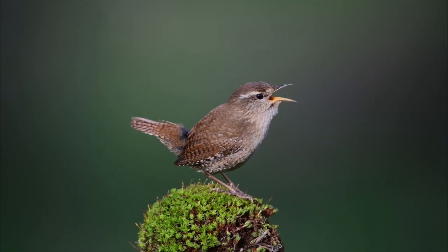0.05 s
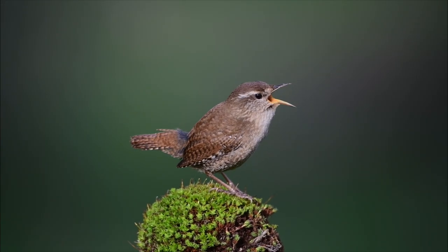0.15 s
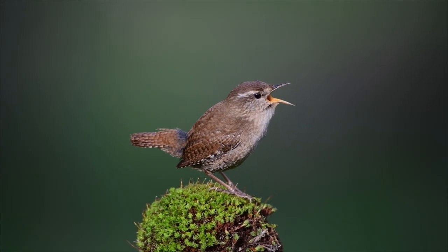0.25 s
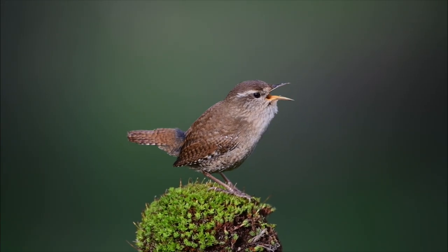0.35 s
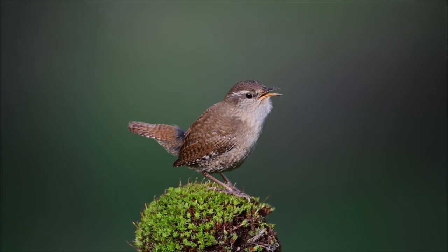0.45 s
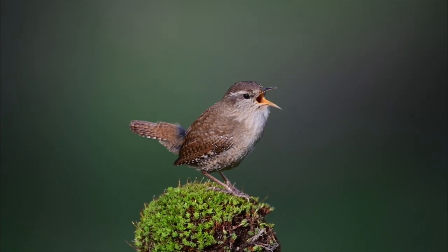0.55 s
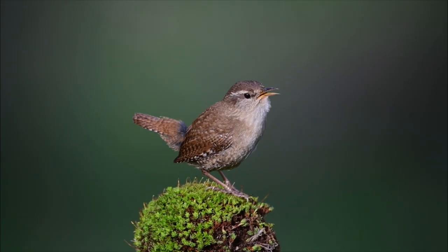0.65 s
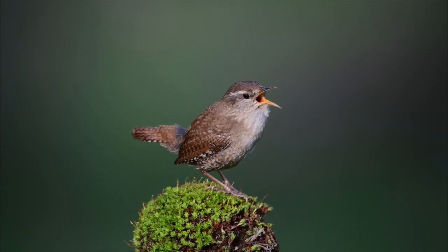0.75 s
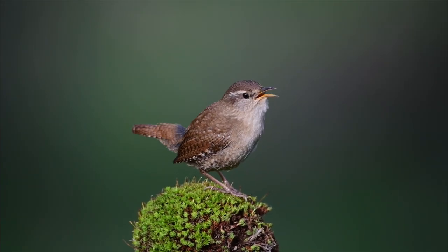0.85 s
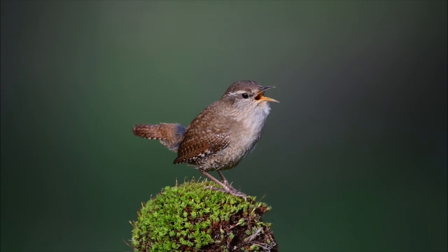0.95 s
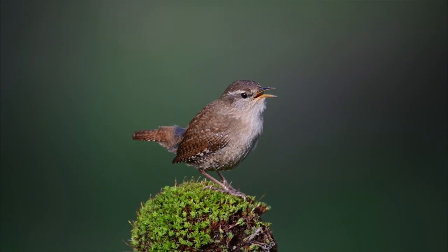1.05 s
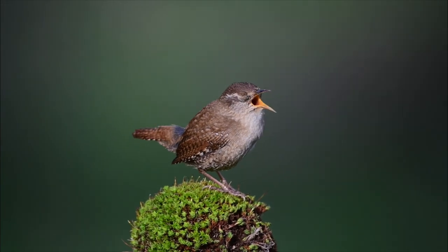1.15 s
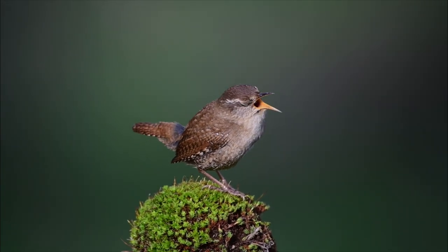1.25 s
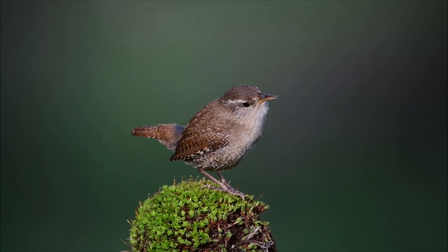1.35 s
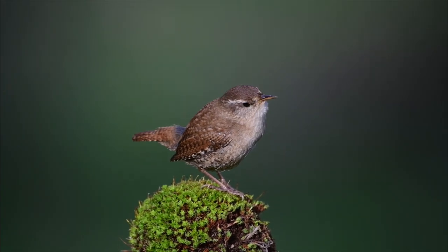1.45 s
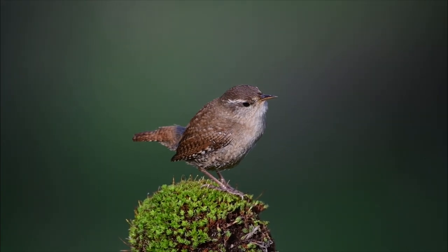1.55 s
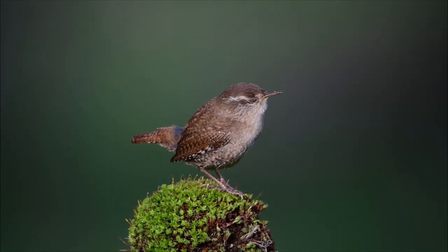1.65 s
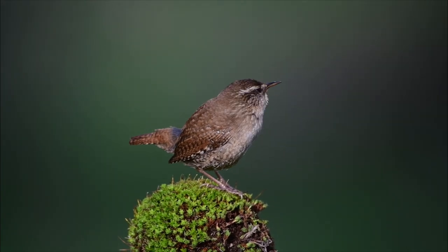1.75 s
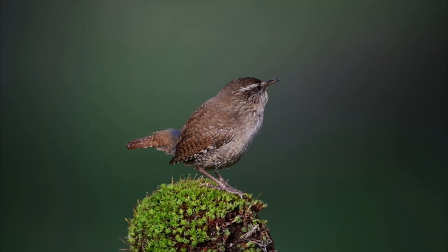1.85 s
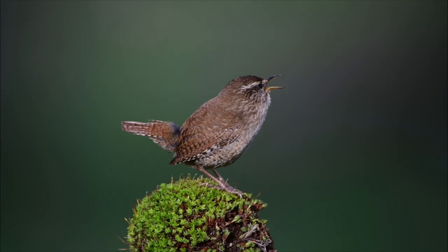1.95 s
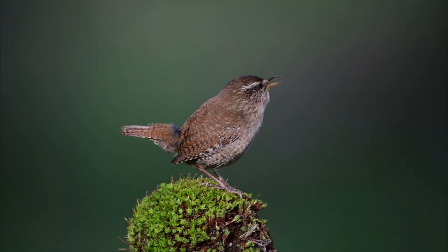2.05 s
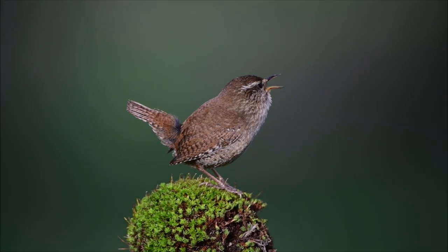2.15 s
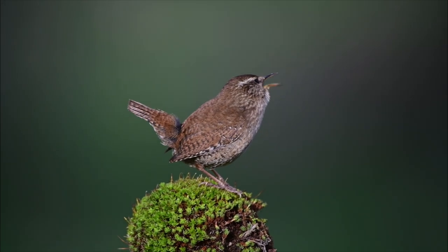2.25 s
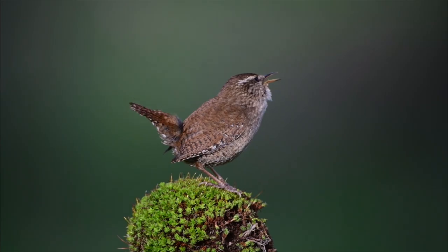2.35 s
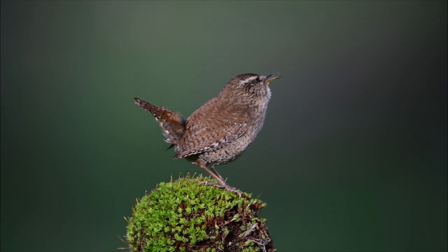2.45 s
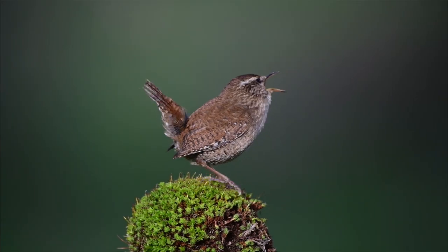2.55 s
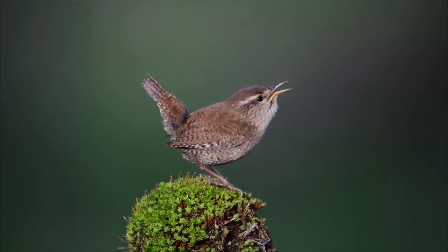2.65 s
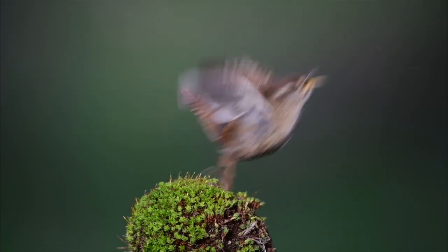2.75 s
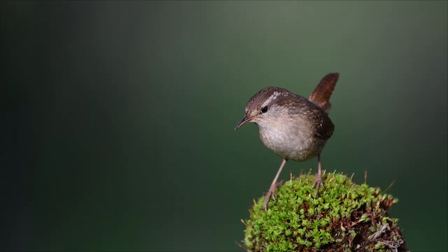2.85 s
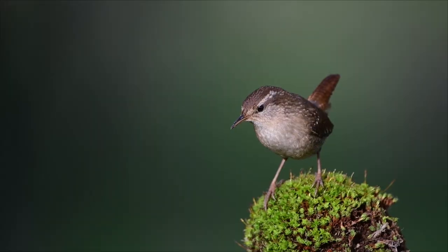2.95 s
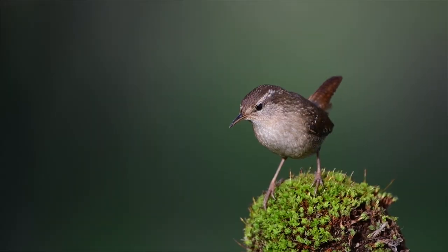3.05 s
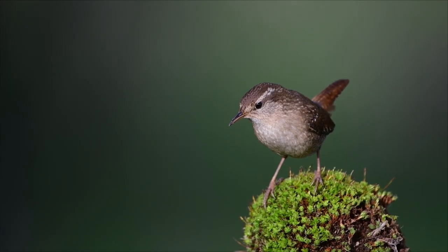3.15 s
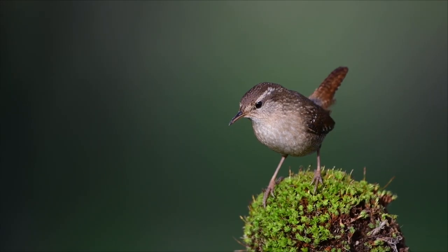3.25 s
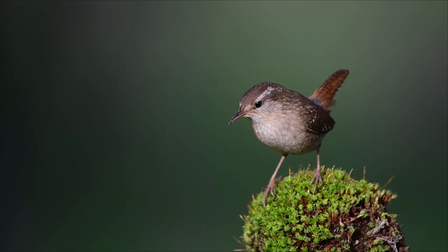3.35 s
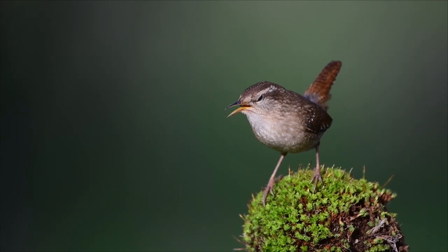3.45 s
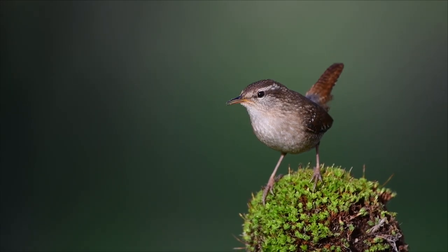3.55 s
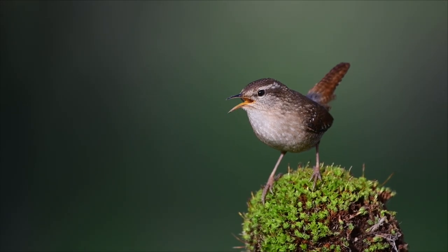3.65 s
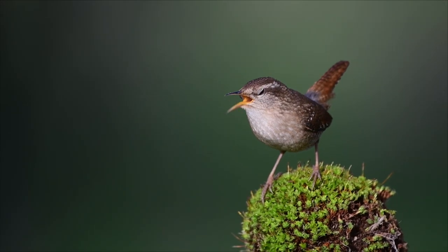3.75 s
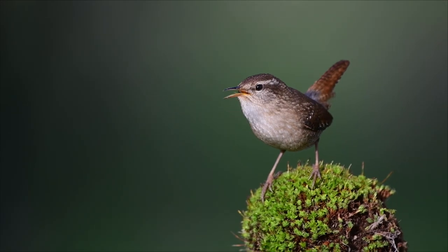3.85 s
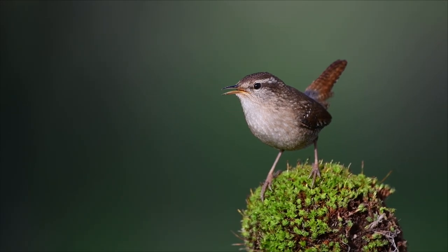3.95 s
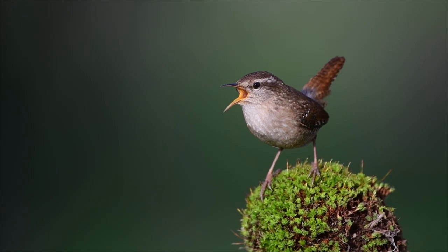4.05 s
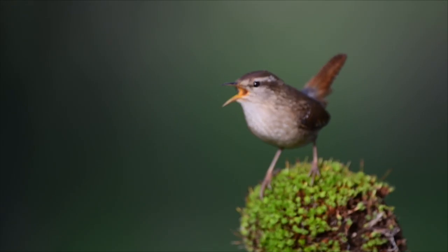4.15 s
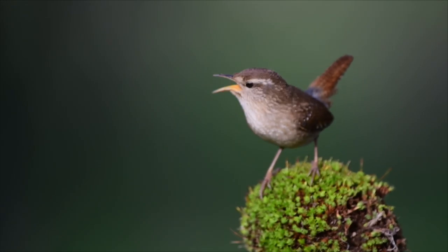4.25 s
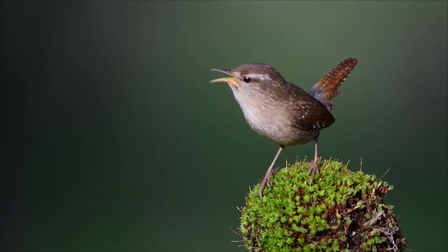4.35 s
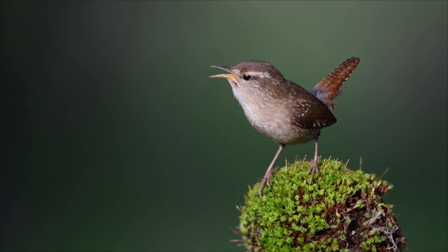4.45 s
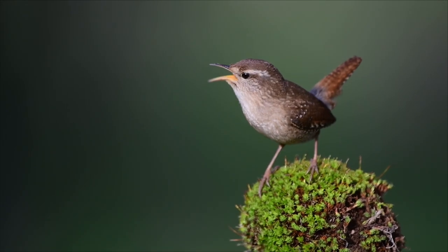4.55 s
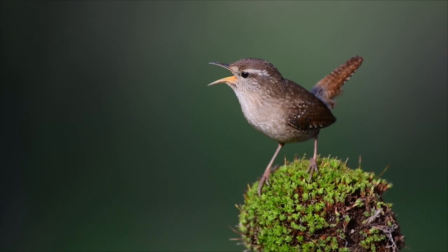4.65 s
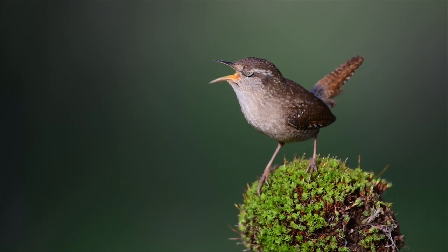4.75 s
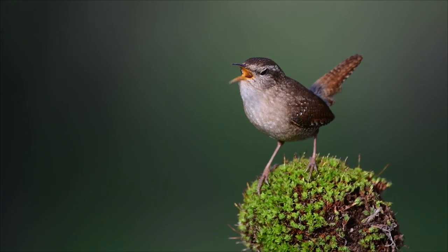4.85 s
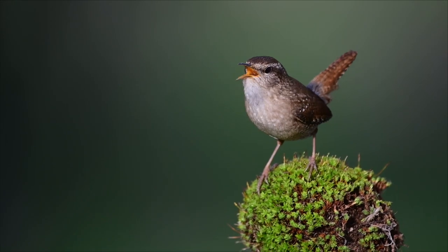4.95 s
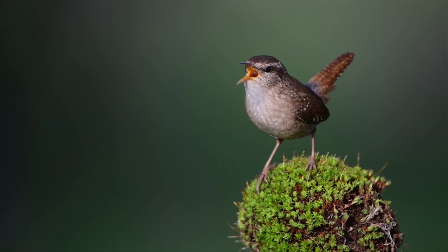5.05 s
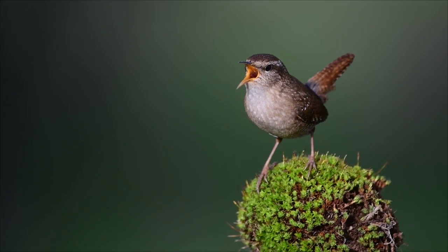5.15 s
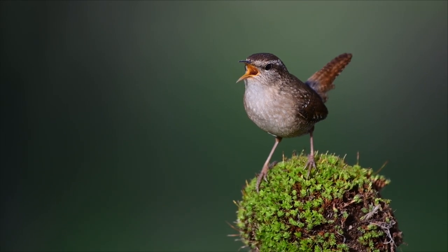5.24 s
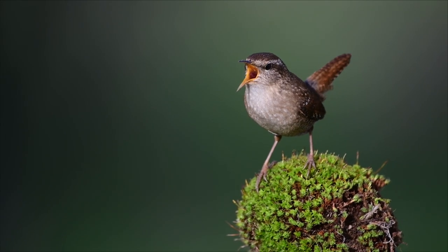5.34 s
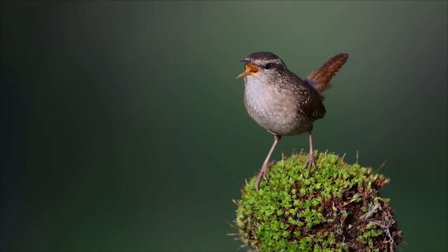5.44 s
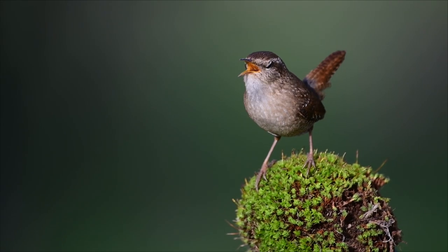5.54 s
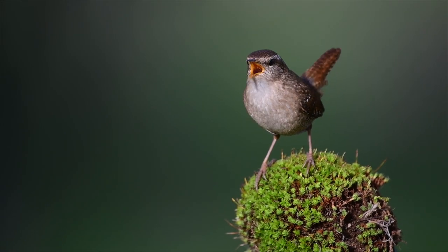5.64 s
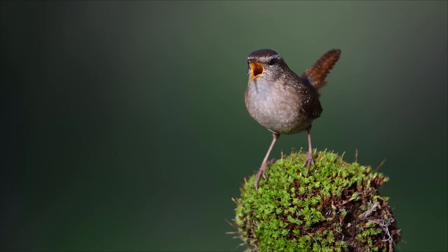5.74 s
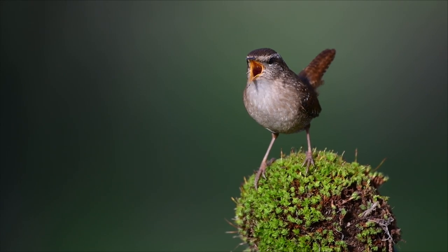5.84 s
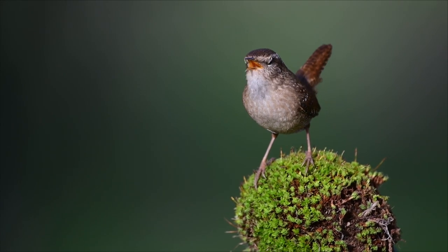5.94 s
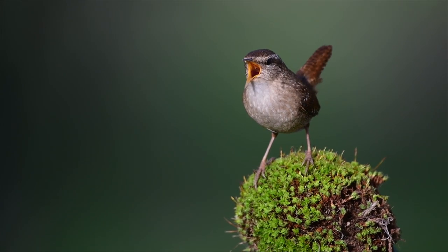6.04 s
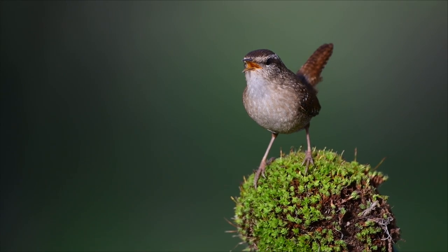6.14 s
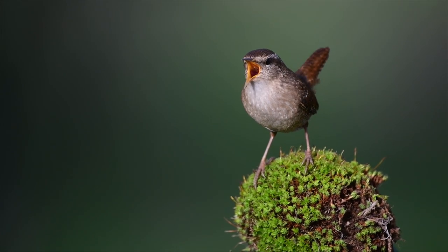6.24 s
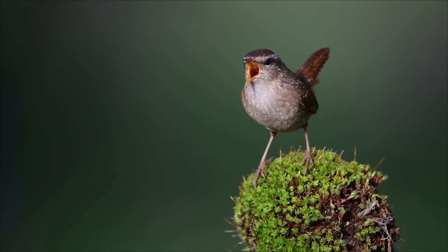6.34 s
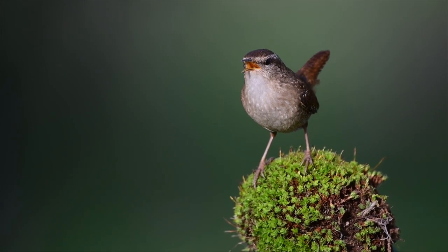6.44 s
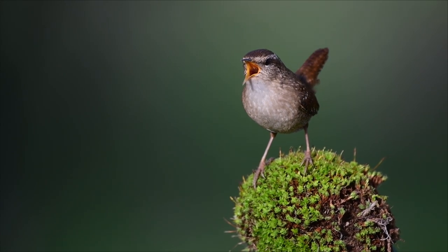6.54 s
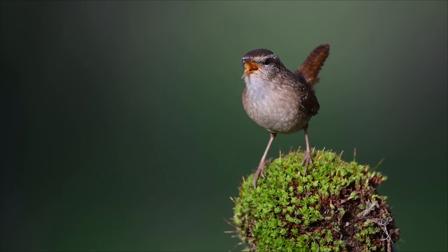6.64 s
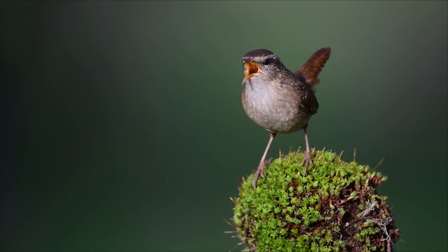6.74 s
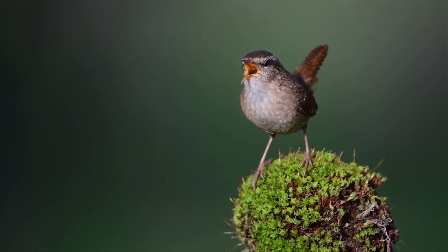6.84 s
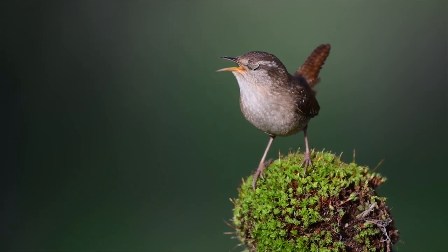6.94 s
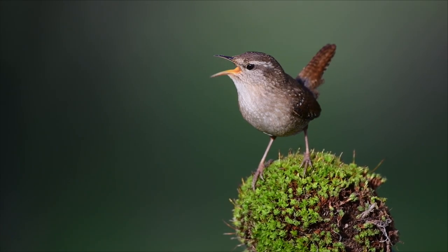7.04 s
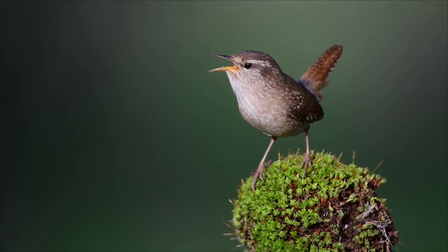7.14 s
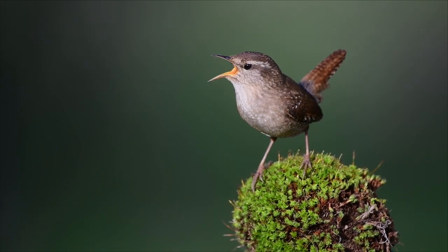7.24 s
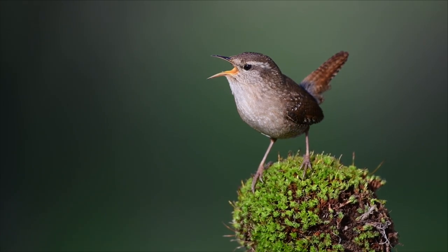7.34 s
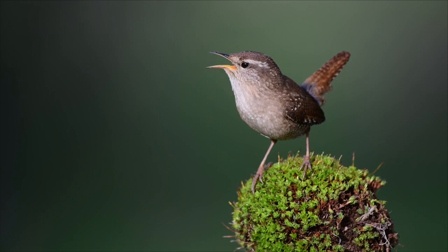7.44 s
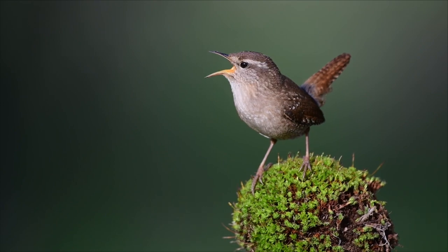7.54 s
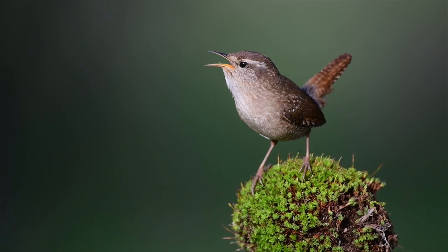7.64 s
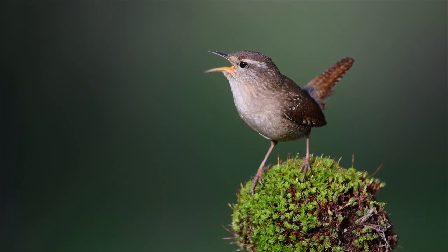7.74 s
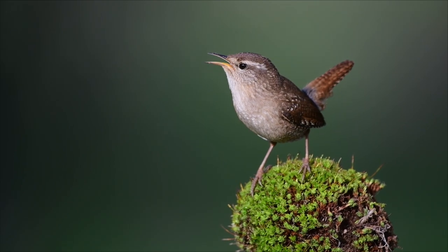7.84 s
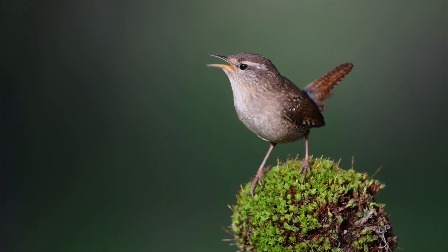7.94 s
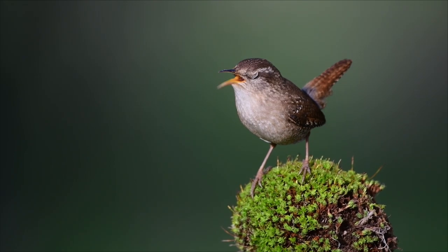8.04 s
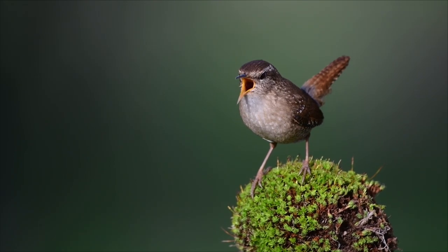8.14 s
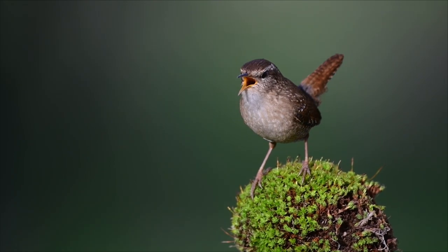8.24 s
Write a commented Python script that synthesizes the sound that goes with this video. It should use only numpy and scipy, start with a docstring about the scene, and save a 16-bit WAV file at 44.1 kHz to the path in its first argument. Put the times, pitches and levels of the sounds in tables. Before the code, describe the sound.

Close outdoor pickup of a wren, very high and clear, with short diffuse echoes from trees. At 0 s three quick upward trill notes finish, then a thin falling whistle and, from 0.4 to 1.1 s, strong downward slides. A long, flat, high tone follows at 1.2 s. From 2 to 2.75 s come softer dips, chirps and held notes, then a trill begins, cut by a tiny dip at 2.9 s. Only faint air, distant traffic and a low engine hum remain until 3.55 s, when the soft phrase returns. From 4.25 to 5.4 s a fast, rattling trill grows louder and slows slightly, with low wind bumps and small dull ticks nearby. Falling whistles ring out until 6.3 s, then a high held note and a wavering turn. From 6.8 s sharp zigzags alternate up and down, ending in quick plunges near 8.2 s.

```python
"""First come three quick notes of a wren's trill, then whistled slides, longer trills and zigzags.
Each note is a gliding sine; trees answer with random echoes that die away.
Underneath are a noise bed of air and traffic, a far engine built from sines, and two faint glides.
Low noise makes wind bumps on the microphone; short noise bursts tick close by.
Just before 2.9 s the level dips briefly and the echoes are cut."""
import sys
import numpy as np
from scipy import signal
from scipy.io import wavfile
from scipy.ndimage import uniform_filter1d

SR = 44100
rng = np.random.default_rng(int(sys.argv[2]) if len(sys.argv) > 2 else 0)


def generate_wav(sig):
    """Save sig (samples, or channels by samples) to the path in sys.argv[1] as 16-bit PCM at SR."""
    pcm = np.round(np.clip(np.atleast_2d(sig).T, -1, 1) * 32767).astype(np.int16)
    wavfile.write(sys.argv[1], SR, pcm)


N = 365588  # length in samples


def gain_of(db):
    """Turns decibels into a factor for the waveform."""
    return 10 ** (np.asarray(db) / 20)


def evened(x):
    """Scales a signal to an average (rms) strength of one."""
    return x / np.sqrt(np.mean(x ** 2) + 1e-20)


def read(points, hz):
    """Reads a table between its points, along a logarithmic frequency axis."""
    f, value = np.transpose(points)
    return np.interp(np.log(hz + 1), np.log(f + 1), value)


def add(mix, s, sound):
    """Mixes a sound in from time s, cutting off what runs past the end."""
    part = mix[round(s * SR):][:len(sound)]
    part += sound[:len(part)]


def curves(rows):
    """Draws each table column as a curve, sample by sample from the first to the last time."""
    s, *columns = np.transpose(rows)
    t = np.arange(s[0], s[-1], 1 / SR)
    return [np.interp(t, s, column) for column in columns]


def wander(n, span):
    """Makes a slow random curve of rms one by smoothing noise twice over span seconds."""
    width = max(round(span * SR), 2)
    smooth = uniform_filter1d(rng.standard_normal(n), width)
    return evened(uniform_filter1d(smooth, width))


# tone colour of the outdoor noise, only its shape counts: (f/Hz, relative level/dB per Hz)
AIR_COLOUR = [(25, -27.5), (140, -7), (300, -11.5), (700, -15), (1200, -21), (2500, -26), (8300, -34),
              (12700, -40.5), (13100, -42), (15500, -53.5)]
# how alike the noise is in the two ears: (f/Hz, likeness, 1 = the same)
EAR_LIKENESS = [(60, 1), (310, 0.94), (1550, 0.55), (7900, 0.056)]
# how the traffic swells and sinks: (t/s, relative level/dB)
TRAFFIC_LEVEL = [(0, -59), (2.88, -59), (2.92, -55.5), (4.64, -55), (5.601, -56.5), (8.29, -58)]


def background():
    """Air and traffic: random short-time spectra, in which passing traffic lifts the low end most."""
    frames, hz = N // 256 + 5, np.fft.rfftfreq(1024, 1 / SR)
    a, b, c, d, patches = rng.standard_normal((frames, 513, 5)).T
    # smooth over neighbouring frequencies, then over time
    patches = uniform_filter1d(uniform_filter1d(patches, 10, 0), 12, 1)
    patches_db = 0.75 * evened(patches)

    likeness = np.clip(read(EAR_LIKENESS, hz), -1, 1)[:, None]
    left = a + 1j * b
    right = likeness * left + np.sqrt(1 - likeness ** 2) * (c + 1j * d)

    s, db = np.transpose(TRAFFIC_LEVEL)
    quiet_db = db.min()
    lift_db = np.interp(np.arange(frames) * 256 / SR, s, db - quiet_db)
    lift_share = 1 / (1 + (hz[:, None] / 3000) ** 2)  # less lift towards the treble

    colour = gain_of(read(AIR_COLOUR, hz))
    middle = (hz > 300) & (hz < 1500)
    colour /= np.sqrt(np.sum(colour[middle] ** 2))
    level = colour[:, None] * gain_of(quiet_db + lift_share * lift_db + patches_db)
    spectra = np.array([left, right]) * level
    return 0.85 * signal.istft(spectra, nperseg=1024, noverlap=768)[1][:, :N]


# far engine: (t/s, shaft f/Hz before wavering, second-order level/dB, fourth-order level/dB)
ENGINE_RUN = [(0, 66.8, -64.5, -61.5), (.5, 67.65, -63, -68.5), (1.1, 69.14, -66, -68.5),
              (1.45, 72.1, -61.5, -76.5), (2.88, 73, -58, -69.5), (2.91, 68.9, -67.5, -63),
              (4, 70, -63, -62.5), (4.5, 68.2, -66.5, -62.5), (5.3, 55.3, -71, -61.5)]
# two faint gliding tones, one list each: (t/s, f/Hz, level/dB)
FAINT_GLIDES = [
    [(6.04, 226.5, -60), (6.33, 283, -63), (6.42, 283, -63)],
    [(6.55, 486.4, -71), (6.9, 473.6, -66.5), (7.2, 457, -69)],
]


def hum():
    """Far engine: sines at multiples of a wavering shaft speed, plus two smooth gliding tones."""
    out = np.zeros(N)
    hz, second_db, fourth_db = curves(ENGINE_RUN)
    wavering_hz = hz * (1 + 0.0053 * wander(len(hz), 0.098))
    phase = 2 * np.pi * np.cumsum(wavering_hz) / SR
    orders = ((1, second_db - 12), (2, second_db), (4, fourth_db), (3, second_db - 11),
              (8, second_db - 16), (9, second_db - 14), (11, second_db - 16))
    for order, db in orders:
        level = gain_of(db + 0.75 * wander(len(hz), 0.026))
        add(out, 0, level * np.sin(order * phase))
    for rows in FAINT_GLIDES:
        hz, db = curves(rows)
        add(out, rows[0][0], gain_of(db) * np.sin(2 * np.pi * np.cumsum(hz) / SR))
    return np.sqrt(2) * out  # a sine of rms one has a peak of root two


# steady wind on the microphone, before its random wander: (t/s, level/dB)
STEADY_WIND = [(0, -70.5), (5.03, -66), (5.36, -70)]
# bumps of wind, before the same wander: (peak t/s, peak level/dB, rise/dB per s, fall/dB per s)
WIND_BUMPS = [(1.27, -53, 200, 160), (2.93, -48.5, 800, 131), (4.29, -50, 100, 130), (4.66, -51, 51, 35)]


def wind():
    """Wind bumping the microphone: lumpy noise, mostly 15-80 Hz, with straight dB rises and falls."""
    t = np.arange(N) / SR
    db = np.interp(t, *np.transpose(STEADY_WIND))
    for s, peak_db, rise, fall in WIND_BUMPS:
        bump_db = peak_db - np.maximum(rise * (s - t), fall * (t - s))
        db = np.maximum(db, bump_db)
    low_band = signal.butter(2, [15, 80], "bandpass", fs=SR, output="sos")
    rumble = signal.sosfilt(low_band, rng.standard_normal(N))
    return evened(rumble) * gain_of(db + 2.1 * wander(N, 0.054))


# something small ticking close by: (t/s, peak level/dB before the mix, resonance f/Hz)
CLOSE_TICKS = [(4.047, -49, 2000), (4.2023, -41, 1580), (4.267, -42.5, 910), (4.3221, -41, 1200),
               (4.5215, -40, 1620), (4.5836, -40.5, 940), (4.622, -40.5, 1240), (4.7774, -53, 1095),
               (4.936, -45.5, 1852), (5.308, -39.5, 1958)]


def ticks():
    """Short dull ticks: a dying burst of noise passes twice through a broad resonance."""
    out, t = np.zeros(N), np.arange(800) / SR
    for s, db, hz in CLOSE_TICKS:
        body = signal.iirpeak(hz, 1.2, SR)
        burst = rng.standard_normal(len(t)) * gain_of(-60 * t / 0.024)  # falls 60 dB in 24 ms
        ring = signal.lfilter(*body, signal.lfilter(*body, burst))
        add(out, s, gain_of(db) * ring / abs(ring).max())
    return out


# colour of the song on its way from the beak, with notches near 4.7 and 6.75 kHz: (f/Hz, level/dB)
SONG_PATH = [(2700, -13.5), (3600, -6), (4200, -2.5), (4450, -6), (4700, -16), (4950, -3.5), (5200, -6),
             (5550, 2.5), (6350, 0.5), (6750, -4.5), (7150, 0), (7450, -7.5), (7900, -3), (8300, -12.5),
             (8900, -4.5), (13000, 8.5), (14500, -9)]


def coloured(x, share):
    """Path from the beak: a filter applies a share of the path's dB curve."""
    hz = np.linspace(0, SR / 2, 513)
    path_filter = signal.firwin2(601, hz, gain_of(share * read(SONG_PATH, hz)), fs=SR)
    return signal.oaconvolve(x, path_filter, "same")


def trees(x, near_db, near_t60, far_db, far_t60, side_db):
    """Near twigs and far trunks scatter the song: sparse random echoes, almost alike in both ears."""
    length = SR // 2
    # one echo at a random place in every 20 samples
    at = np.arange(80, length - 20, 20) + rng.integers(0, 20, (2, (length - 81) // 20))
    taps = np.zeros((2, length))
    np.put_along_axis(taps, at, rng.standard_normal(at.shape), 1)

    t, shape = np.arange(length) / SR, 0
    for db, t60 in ((near_db, near_t60), (far_db, far_t60)):  # t60: seconds to fall by 60 dB
        evening = np.sqrt(t60 * SR / 20 / (6 * np.log(10)))  # long tails gain no extra energy
        shape = shape + gain_of(db - 60 * t / t60) / evening

    treble = signal.butter(2, 4700, "highpass", fs=SR)  # leaves scatter treble best
    bright = signal.lfilter(*treble, coloured(x, share=.6))
    mid, side = signal.fftconvolve(bright[None], taps * shape, axes=1)[:, :N]
    # the side echoes have opposite signs in the two ears
    return coloured(x, share=1) + mid + gain_of(side_db) * side * np.array([[1], [-1]])


# pitch of each kind of note, before stretching and slight detuning: (t/s from its start, f/Hz)
NOTE_PITCH = { "trill": [(0, 2700), (.006, 3950), (.014, 4600), (.029, 6180), (.0384, 6620)],
              "high fall": [(0, 9250), (.0125, 8060), (.0244, 7750), (.0693, 7370), (.13, 7140),
              (.161, 7150)], "slope": [(0, 6300), (.01, 5600), (.022, 5120), (.06, 4260), (.088, 3820),
              (.11, 3620)], "slide": [(0, 6880), (.02, 6780), (.047, 6150), (.0605, 5120), (.071, 4700),
              (.087, 4240), (.113, 3830), (.125, 3740)], "low slope": [(0, 5200), (.008, 5180),
              (.042, 4670), (.091, 3770), (.116, 3540)], "long flat": [(0, 6850), (.015, 7440), (.1, 7530),
              (.226, 7300)], "dip": [(0, 5760), (.022, 5440), (.045, 5600), (.068, 6520), (.072, 6560)],
              "hook": [(0, 7170), (.013, 7900), (.027, 7260), (.0424, 6980)], "rise": [(0, 4250),
              (.0145, 6030), (.019, 5980)], "fall": [(0, 5850), (.0095, 5020), (.02, 4830)],
              "arch": [(0, 5700), (.009, 7250), (.017, 7550), (.032, 7100), (.058, 6450)],
              "low flat": [(0, 2700), (.011, 3750), (.024, 4050), (.044, 4200), (.11, 4250)],
              "long arch": [(0, 5600), (.0075, 7000), (.021, 7500), (.049, 7520), (.077, 7420),
              (.112, 7030)], "high flat": [(0, 6600), (.016, 7640), (.0434, 7760), (.164, 7540)],
              "wave": [(0, 5620), (.01, 6480), (.016, 6700), (.0294, 5080), (.0359, 4950), (.059, 5190),
              (.07, 5700)], "bow": [(0, 5000), (.02, 4780), (.048, 3950), (.056, 3800)], "nick": [(0, 6990),
              (.0065, 6150), (.0115, 5300)], "tent": [(0, 6000), (.0139, 7680), (.0244, 8380),
              (.0429, 7410), (.0513, 7170), (.0693, 6930)], "drop": [(0, 5300), (.004, 5650), (.0105, 5560),
              (.022, 5000), (.0344, 4720), (.057, 4010), (.068, 3950)], "plunge": [(0, 8450), (.017, 7000),
              (.0384, 5160), (.048, 4550)], "short drop": [(0, 6000), (.0185, 5470), (.0224, 5080),
              (.034, 4720)], "flick": [(0, 5260), (.008, 6100), (.013, 6260)], "faint flat": [(0, 4700),
              (.026, 4760)], "sag": [(0, 5800), (.011, 5550), (.0225, 5040)], }
# how much louder a note ends than it begins, apart from its soft edges: (level change/dB);
# notes not listed hold their level
NOTE_SWELL = {"trill": -7, "high fall": -7, "slope": 5, "slide": 0.5, "low slope": 6, "dip": 14, "hook": 5,
              "rise": 4, "fall": -11, "arch": 5.5, "low flat": -5.5, "long arch": 5, "high flat": -2,
              "wave": -4, "bow": 3.5, "tent": -6, "plunge": -1.5, "short drop": 6, "nick": 16, "drop": 2.5,
              "sag": 11}
# names of the notes that creep in
SOFT_NOTES = ("high fall", "plunge", "long arch", "hook", "high flat", "short drop", "slide", "dip")
ATTACK_S, START_DB = 0.0074, -11.5  # usual rise
SOFT_ATTACK_S, SOFT_START_DB = 0.015, -29.5  # rise of the notes that creep in
RELEASE_S, END_DB = 0.0067, -13  # fade of every note
OVERTONE_DB = -52  # second harmonic against the first, as sung


def syllable(name, level_db, stretch=1, more_swell_db=0):
    """One note from the syrinx: a slightly unsteady, near-pure sine whose pitch follows a gesture."""
    hz, = curves(np.array(NOTE_PITCH[name]) * [stretch, 1])
    t = np.arange(len(hz)) / SR
    attack, start_db = (SOFT_ATTACK_S, SOFT_START_DB) if name in SOFT_NOTES else (ATTACK_S, START_DB)
    swell_db = (NOTE_SWELL.get(name, 0) + more_swell_db) * (t / t[-1] - .5)
    rise_db = start_db * np.clip(1 - t / attack, 0, 1)
    fade_db = END_DB * np.clip(1 - (t[-1] - t) / RELEASE_S, 0, 1)
    db = level_db + swell_db + rise_db + fade_db

    # round the corners of the pitch and detune the note a little
    hz = uniform_filter1d(hz, 120, mode="nearest") * (1 + .004 * rng.standard_normal())
    phase = 2 * np.pi * (np.cumsum(hz) / SR + rng.random())
    level = gain_of(db + 1.3 * wander(len(hz), .004))
    whistle = np.sin(phase) + gain_of(OVERTONE_DB) * np.sin(2 * phase)
    smooth_ends = signal.windows.tukey(len(hz), 220 / len(hz))
    return np.sqrt(2) * level * whistle * smooth_ends


SLOWING_S, OFFBEAT_EARLY_S = .00018, .0013  # period gain per note; every second note comes early
GROWTH_DB, LENGTHENING = 0.3464, 0.16  # level gain per note; most that the length factor can gain
SETTLE_NOTES = 7.4  # how slowly the trill settles, in notes
EARLY_SWELL_DB = 6.5  # extra swell of the first note, so early notes begin more weakly


def trill(start, notes, period, level_db, stretch):
    """A run of rising notes that slows down, grows louder and lengthens as it goes on."""
    k = np.arange(notes)
    times = start + period * k + SLOWING_S * k * (k - 1) / 2 - OFFBEAT_EARLY_S * (k % 2)
    fresh = np.exp(-k / SETTLE_NOTES)  # from one towards zero
    levels_db = level_db + GROWTH_DB * k
    stretches = stretch + LENGTHENING * (1 - fresh)
    rows = zip(times, levels_db, stretches, EARLY_SWELL_DB * fresh)
    return [(t, syllable("trill", *note)) for t, *note in rows]


# trills: (start t/s, number of notes, first period/s before the early shift,
# first level/dB before the path's colour, first length factor)
TRILL_RUNS = [(.001, 3, 0.061, -36, 1.01), (2.768, 3, 0.059, -40.5, 0.84), (4.252, 20, .0541, -38, 0.76)]
# single notes, listed by kind: (start t/s, level/dB before the path's colour)
SONG_NOTES = { "low slope": [(.434, -30.5)], "high fall": [(0.2085, -37.5), (5.398, -33.5)],
              "slope": [(5.6205, -30)], "slide": [(0.607, -31), (0.805, -32), (0.9905, -33), (5.788, -29.5),
              (5.967, -29.5), (6.1455, -29.5)], "long flat": [(1.198, -43)], "dip": [(1.9995, -48.5),
              (3.552, -47)], "hook": [(2.174, -49.5), (3.71, -47.5)], "rise": [(2.236, -41), (3.764, -41)],
              "arch": [(2.302, -42.5), (3.83, -41.5)], "low flat": [(2.425, -39), (3.939, -37.5)],
              "long arch": [(2.6225, -41), (4.118, -37)], "high flat": [(6.347, -32)],
              "wave": [(6.6135, -32.5)], "bow": [(6.705, -29)], "nick": [(6.8265, -29.5), (7.089, -29.5),
              (7.3395, -30), (7.5945, -29.5), (7.851, -29)], "drop": [(6.952, -30.5), (7.21, -32),
              (7.4605, -32), (7.7185, -30)], "plunge": [(8.095, -31.5)], "short drop": [(8.186, -30.5)],
              "flick": [(8.246, -34)], }
# notes that always follow another kind: (second note, delay t/s, level/dB against the first)
FOLLOWING_NOTES = {"rise": ("fall", .022, 1), "nick": ("tent", .022, -6), "flick": ("sag", .02, 2.8),
                   "drop": ("faint flat", .071, -7), "bow": ("faint flat", .064, -6)}
# the level dips between these two times: (start t/s, end t/s)
DIP_TIMES = (2.8915, 2.902)


def wren():
    """The wren: places all sung notes in time, with those before and after the dip kept apart."""
    notes = [note for row in TRILL_RUNS for note in trill(*row)]
    for name, times in SONG_NOTES.items():
        notes += [(t, syllable(name, db)) for t, db in times]
    for name, (second, delay, rel_db) in FOLLOWING_NOTES.items():
        notes += [(t + delay, syllable(second, db + rel_db)) for t, db in SONG_NOTES[name]]
    before, after = np.zeros(N), np.zeros(N)
    for t, sound in notes:
        add(before if t < DIP_TIMES[0] else after, t, sound)
    return before, after


def scene():
    """Mixes the background with the wren among trees; a brief dip also cuts the earlier echoes."""
    t = np.arange(N) / SR
    outdoors = background() + hum() + wind() + ticks()
    before, after = (trees(x, near_db=-11.5, near_t60=0.13, far_db=-19.5, far_t60=0.48, side_db=-32)
                     for x in wren())
    open_before = np.clip((DIP_TIMES[0] - t) / .0003, 0, 1)
    open_after = np.clip((t - DIP_TIMES[1]) / .002, 0, 1)
    # a little of the background stays audible in the dip
    return before * open_before + after + outdoors * (0.055 + open_before + open_after)


def record(dry):
    """Limits the band: a steep low-pass filter takes away the sound above about 15.7 kHz."""
    low_pass = signal.firwin(511, 15720, window=("kaiser", 9), fs=SR)
    return signal.oaconvolve(dry, low_pass[None], "same")


dry = scene()
out = record(dry)
generate_wav(out)
```